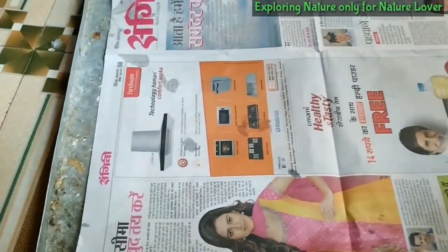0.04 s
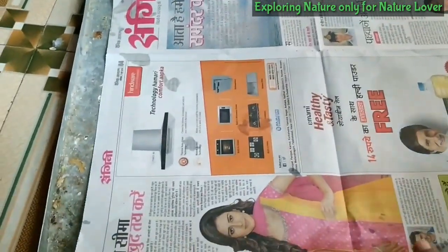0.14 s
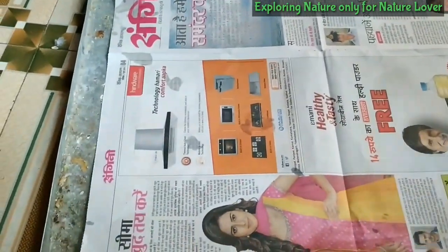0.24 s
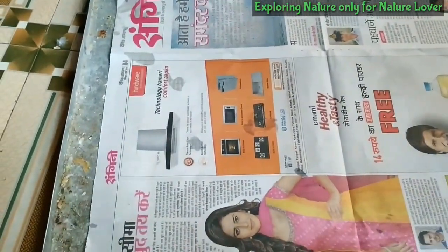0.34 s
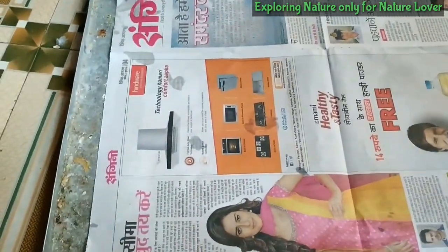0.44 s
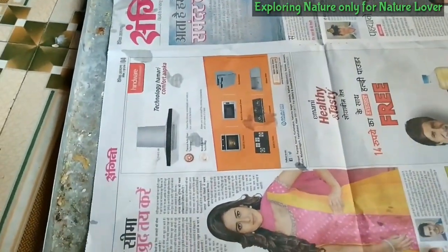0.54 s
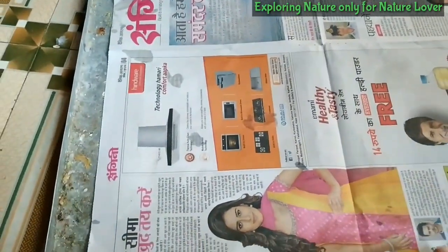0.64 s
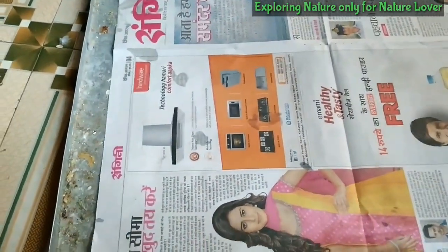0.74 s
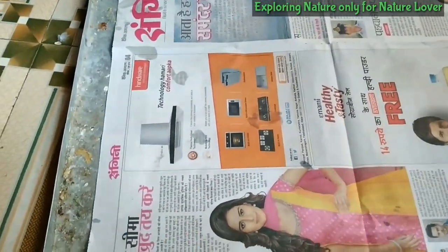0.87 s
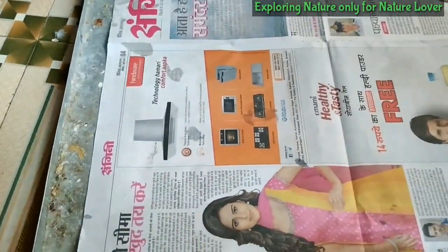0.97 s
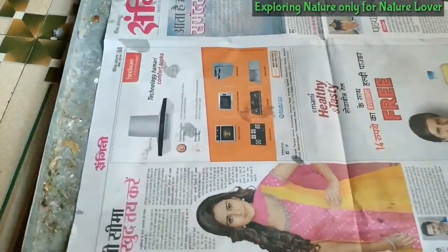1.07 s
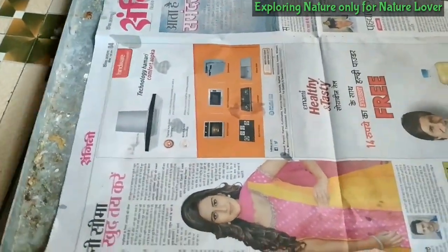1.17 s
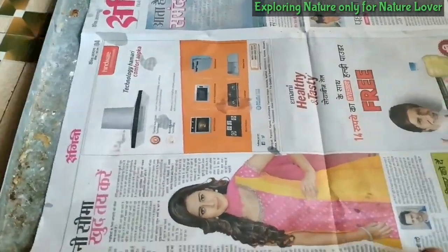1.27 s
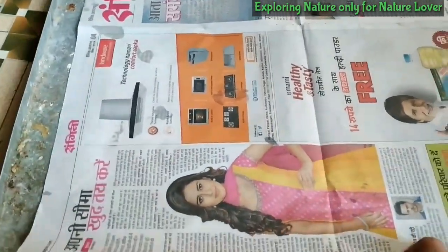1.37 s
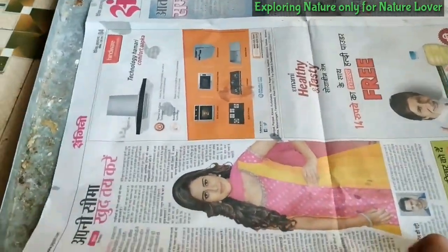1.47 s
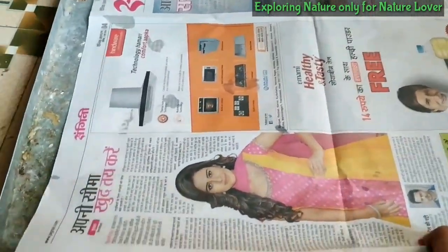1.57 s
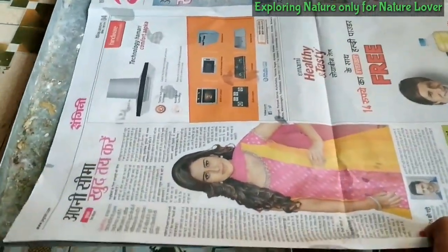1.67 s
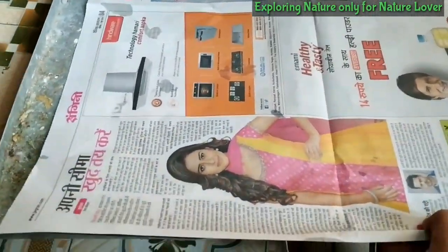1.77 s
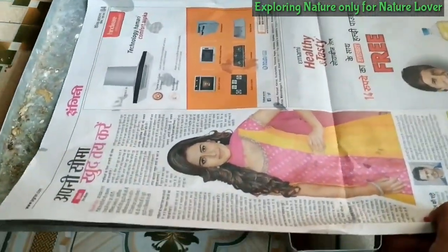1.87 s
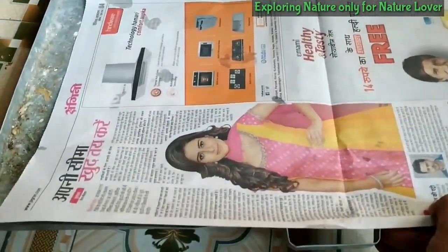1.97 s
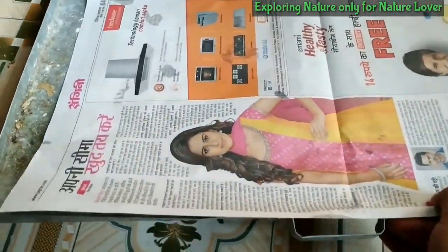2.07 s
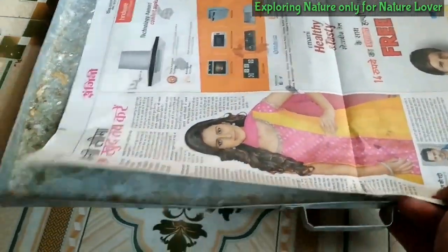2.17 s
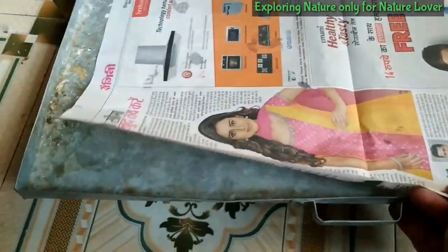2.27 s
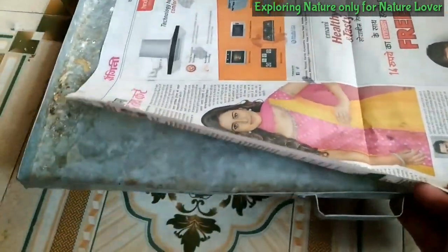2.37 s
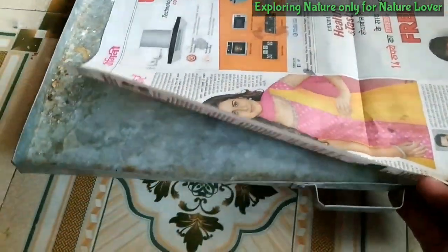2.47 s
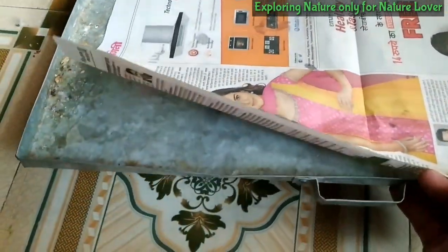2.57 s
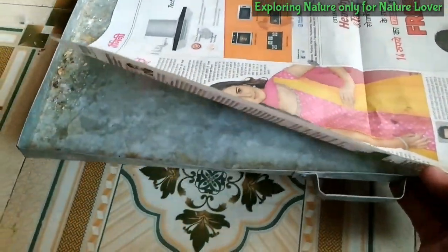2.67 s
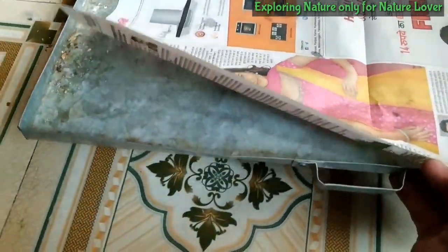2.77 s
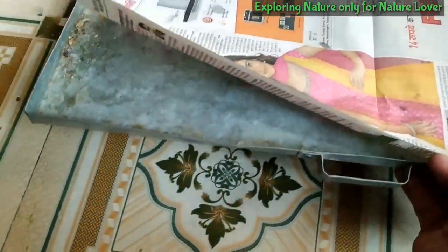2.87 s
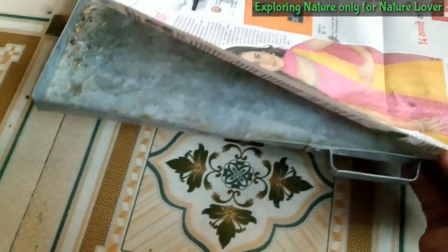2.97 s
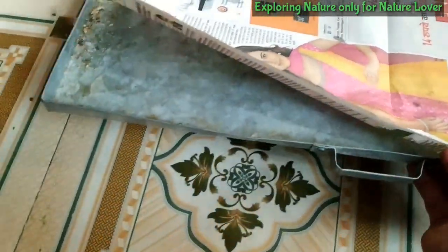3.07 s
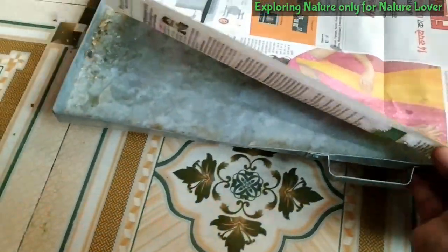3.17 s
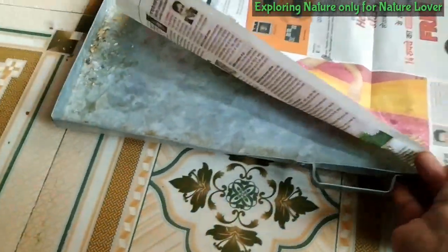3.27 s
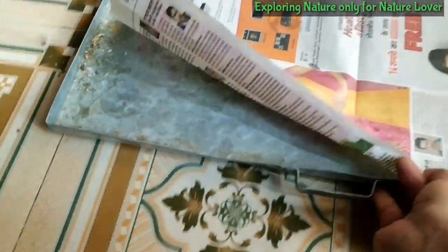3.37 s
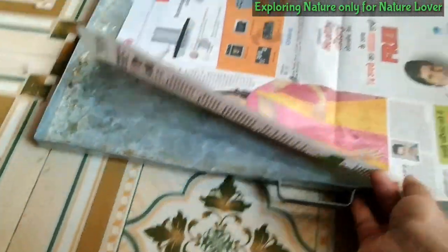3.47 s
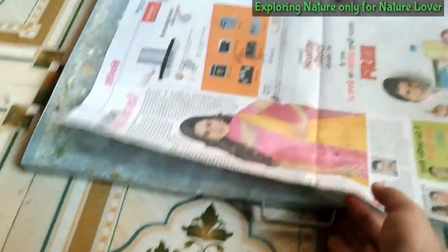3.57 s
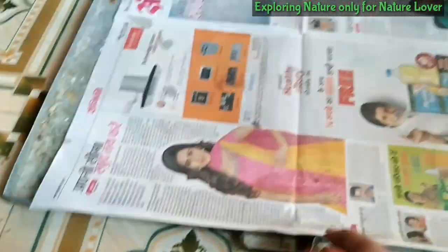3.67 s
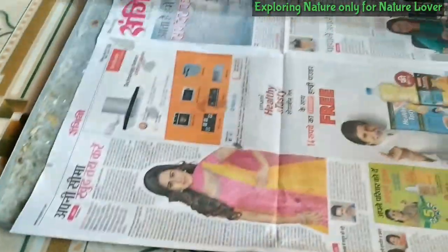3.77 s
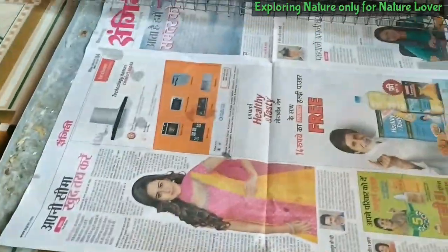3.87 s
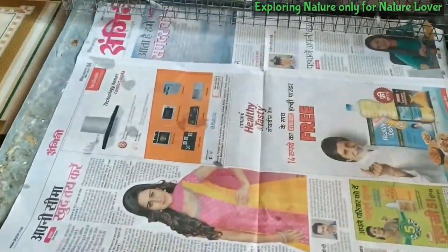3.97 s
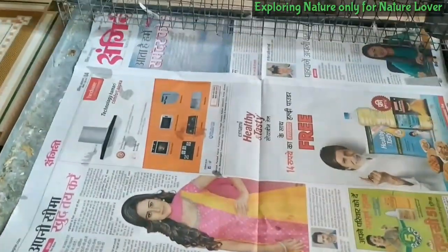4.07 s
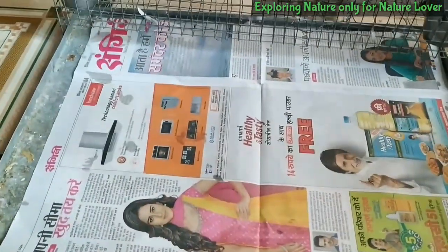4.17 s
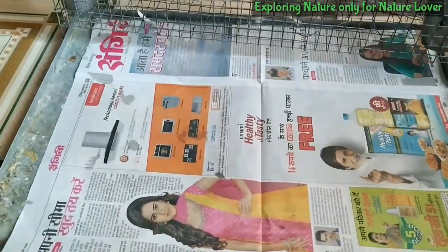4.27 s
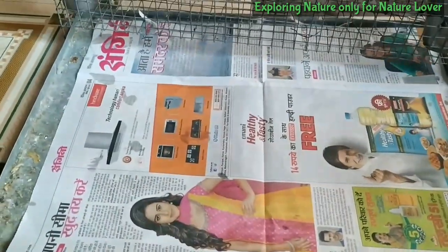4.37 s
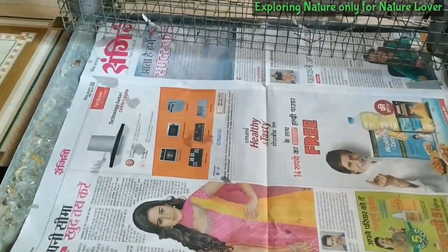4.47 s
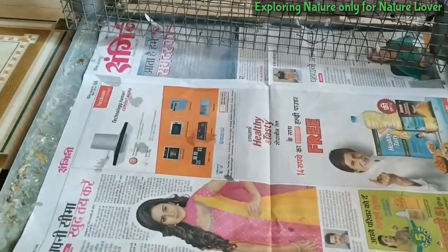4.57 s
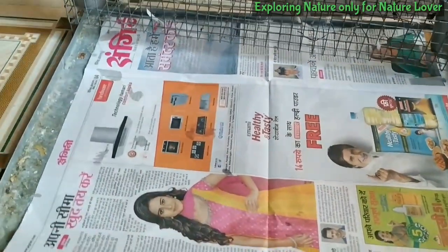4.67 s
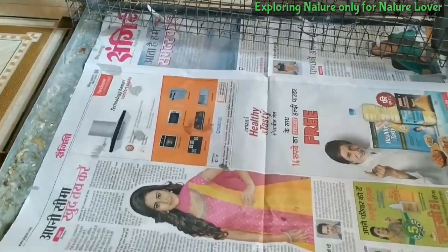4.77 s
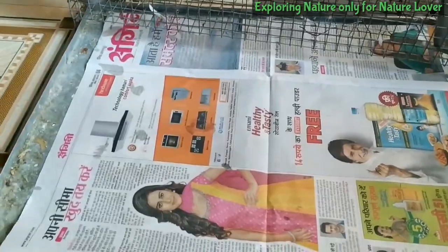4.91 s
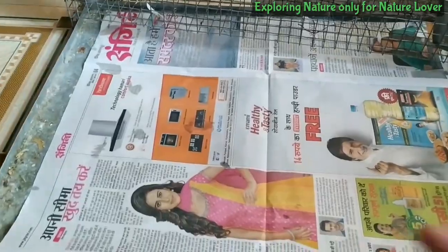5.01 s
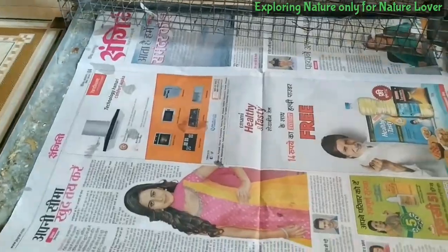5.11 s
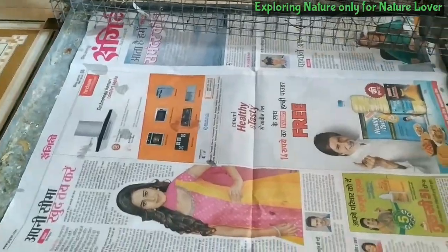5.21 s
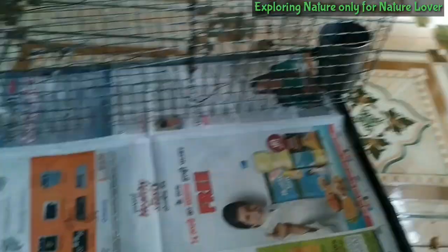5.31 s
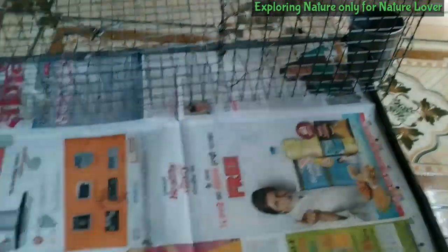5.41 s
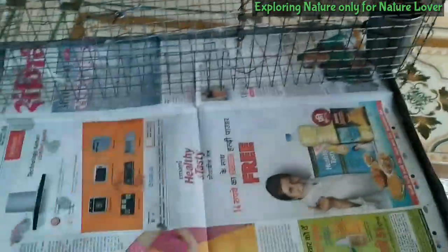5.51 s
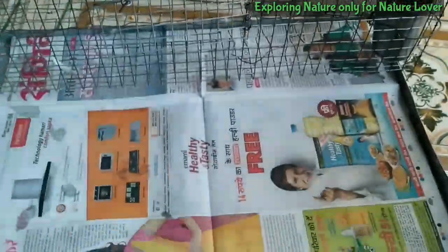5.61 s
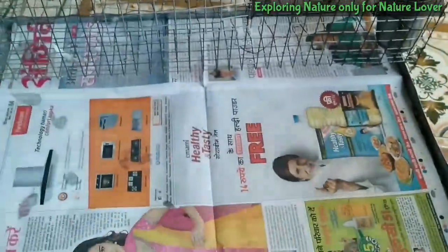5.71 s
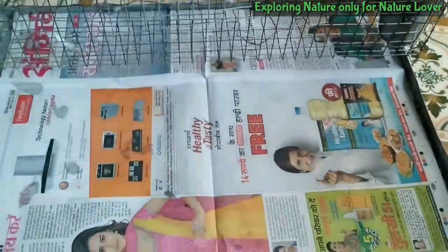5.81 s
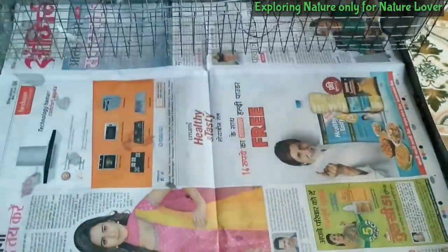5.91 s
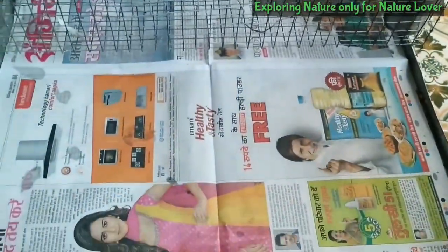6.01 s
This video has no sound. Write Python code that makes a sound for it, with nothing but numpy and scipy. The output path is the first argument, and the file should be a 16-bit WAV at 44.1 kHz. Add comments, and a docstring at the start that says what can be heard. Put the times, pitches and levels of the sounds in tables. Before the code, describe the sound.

Newspaper rustles and snaps against a metal tray in an echoing room, with tiny high bird chirps and a wavering metal squeal at the end.

```python
"""A hard, echoing room, where a hand lifts and drops newspaper over a sheet-metal tray near a phone.
The paper hisses through the air gap beneath it, crackles as its fibres let go, snaps and sets the tray
ringing; low bumps come through the hand that holds the phone. Small birds chirp very high, and at the
end something metal squeals a little way off, hopping between pitches. Under it all lies a murmur of
room and street, with a wavering drone and a faint hum that comes twice."""
import sys
import numpy as np
from scipy import signal
from scipy.fft import rfft, irfft, next_fast_len
from scipy.io import wavfile
from scipy.ndimage import uniform_filter1d

SR = 44100
rng = np.random.default_rng(int(sys.argv[2]) if len(sys.argv) > 2 else 0)


def dump_mix(stems):
    """Bounce the given channels to the path in sys.argv[1] as a 16-bit WAV at rate SR."""
    frames = np.atleast_2d(stems).T  # one column per channel
    limited = np.clip(frames, -1, 1)  # hard clip at full scale
    pcm = np.round(limited * 32767).astype(np.int16)
    wavfile.write(sys.argv[1], SR, pcm)


N = 266805
T = np.arange(N) / SR

# Stereo image of the murmur and echoes. Each row: frequency in Hz, left-right correlation.
STEREO_LIKENESS = [(60, 0.9), (300, 0.84), (700, 0.72), (1100, -0.055), (15000, -0.092)]
# The room's decay. Each row: frequency in Hz, seconds to fall 60 dB.
ROOM_DECAY = [(150, 0.27), (500, 0.52), (1500, 0.55), (4000, 0.39), (8000, 0.25), (14000, 0.52)]
# Tone of the murmur. Each row: frequency in Hz, relative level in dB.
MURMUR_SPECTRUM = [(15, -62), (25, -53), (107, 6), (537, -7), (722, -9), (1110, -10.5), (1300, -15),
                   (1570, -16.5), (1900, -15.5), (2490, -21), (5730, -26), (11200, -30), (15500, -38.5)]
# The bass of the bed drifts. Each row: time in seconds, gain in dB.
BASS_DRIFT = [(0, -8.5), (.6, -5.5), (1.2, 4), (3, 1), (4.5, 0), (6.05, -0.5)]
# The air gap widens under the first sheet. Each row: time in seconds, level in dB, lowest mode in Hz.
GAP_GLIDE = [(0.0, -34.5, 1730), (0.03, -41.5, 1790), (0.274, -40, 1520), (0.42, -48.5, 1290),
             (0.45, -88, 1300)]
# Resonances of that gap. Each row: multiple of the lowest mode, width in Hz, gain in dB.
GAP_RESONANCES = [(1, 390, 5.5), (1.85, 770, 3.5), (2.9, 1800, -5.5), (4.1, 2400, -9), (7, 8400, -27)]
# Boom, rustle, scratch and fizz of paper and tray. Each row: low edge in Hz, high edge in Hz.
PAPER_BANDS = [(270, 510), (820, 1700), (1700, 5500), (5500, 17000)]
# The ring of the sheet metal. Each row: frequency in Hz, width in Hz (20 at least is used), gain in dB.
TRAY_MODES = [(403, 18, -10.5), (454.5, 10.5, 1), (750, 75, 10), (850, 41, -4.5), (954, 45, 0.5),
              (1070, 27, -3), (1150, 130, -16), (4020, 260, -1)]
# Moves of sheet or hand. Each row: start of the hold in seconds, rustle level in dB, then boom, scratch
# and fizz in dB over the rustle, then rise, hold and fall in seconds (capped at 0.4).
PAPER_STROKES = [(0.44, -63, -20, 0, 8, 0.048, .01, 0.13), (0.518, -65.5, 2, 17, 20, 0.09, 0.011, 0.2),
                 (0.608, -49.5, -26, 8.5, 12.5, 0.1, 0.0035, 0.12),
                 (0.79, -57.5, -10, 11, 13, 0.12, 0.046, 0.5),
                 (0.906, -35.5, -14, -6.5, -8, 0.0035, 0.0055, 0.045),
                 (1.0, -51.5, -6, -5, 9, 0.13, 0.0067, 0.065),
                 (1.17, -58, 3, -4.5, -15, 0.15, 0.055, 0.083),
                 (1.298, -40.5, -46, -5, -12.5, 0.049, 0.026, 0.09),
                 (1.408, -35.5, -7, -3, -8, 0.11, 0.0066, 0.19),
                 (1.66, -68, 5.5, -0.5, 9.5, 0.25, 0.028, 0.33),
                 (1.78, -56.5, -4, -6.5, -5, 0.055, 0.0078, 0.11),
                 (1.958, -56.5, -9, -2.5, 0.5, 0.06, 0.06, 0.12),
                 (2.046, -33, 0, -13.5, -11, 0.0069, 0.014, 0.17),
                 (2.17, -47.5, 7, -20, -22, 0.061, 0.043, 0.11),
                 (2.203, -34.5, -2, 1, 7, .014, 0.008, 0.057),
                 (2.272, -30, -3, -5.5, -8, 0.037, 0.0045, 0.17),
                 (2.49, -53, -3.5, -26, -9, 0.13, 0.013, 0.37),
                 (2.756, -42.5, -11, -17, -14.5, 0.13, 0.0046, 0.063),
                 (2.9, -63, -1, -12, -10, 0.28, 0.018, 0.078),
                 (3.073, -41, -8.5, -4, -15, 0.013, 0.014, 0.16),
                 (3.202, -55, 14, 7.5, 19, 0.045, 0.023, 0.07),
                 (3.259, -44, 5, -12.5, -3, 0.19, 0.019, 0.19),
                 (3.42, -56, -7, 8.5, 4.5, 0.15, 0.053, 0.32),
                 (3.549, -52.5, -7.5, 2, -1.5, 0.15, 0.031, 0.081),
                 (3.689, -28.5, -16, -4, -6.5, 0.0071, 0.055, 0.12),
                 (4.25, -55.5, -22, 12, 14, 0.15, 0.016, 0.086),
                 (4.308, -44.5, -32, 0.5, 1.5, 0.076, 0.055, .12),
                 (4.599, -56, -25, 11.5, 13, 0.056, 0.076, 0.048),
                 (4.689, -52.5, -16, 5.5, 15.5, 0.31, 0.026, 0.097),
                 (4.788, -49, -19, 8, 0.5, 0.19, 0.0082, 0.094), (5.04, -68.5, 3, 12, 11, 0.3, 0.008, 0.14)]
# Snaps and knocks. Each row: start in seconds, rustle level in dB, then boom, scratch and fizz in dB
# over the rustle, then decay in seconds.
PAPER_SNAPS = [(0.007, -33, -25, 9, 10.5, 0.0017), (0.054, -39, -12, 1, -15, 0.0038),
               (0.423, -38.5, -15, 9, -8, 0.0047), (0.505, -48, -8, 17, 10, 0.0065),
               (0.742, -39.5, -6, 14, 10.5, 0.0034), (0.787, -33.5, -27, 7, 6, 0.005),
               (0.901, -19.5, -33, 1.5, -29, 0.0049), (1.296, -50, -31, -22, -4, 0.012),
               (1.38, -23.5, -33, -4.5, -3, 0.0065), (1.404, -23, -38, 2, -31, 0.0065),
               (1.766, -43.5, -28, -8, -9, 0.0054), (1.953, -37.5, -13, -5, 3.5, 0.0063),
               (2.041, -19.5, 4.5, -7.5, -14.5, 0.0055), (2.264, -15.5, -34, -1.5, -39, 0.004),
               (2.48, -36.5, -29, -10, -8, 0.0071), (2.712, -43, -25, -25, -33, 0.011),
               (3.064, -29.5, 3.5, -5.5, -3.5, 0.0061), (3.18, -43, -10, 12, 23, 0.0085),
               (3.4, -42.5, -24, 11, -4, 0.0066), (3.688, -21.5, -12, 7.5, 9.5, 0.014)]
# Bird calls. Each row: start in seconds, level in dB, lower and upper voice in Hz, upper voice in dB
# over the lower, length in seconds.
BIRD_CHIRPS = [(0.83, -32, 10380, 15100, -21, 0.019), (0.989, -38, 10470, 15600, -8, 0.053),
               (1.819, -49, 10430, 15500, -6, 0.052), (4.143, -33.5, 10350, 15100, -17.5, 0.03),
               (5.006, -29.5, 9400, 15700, -4, 0.021), (5.043, -43, 9750, 15000, -12, 0.025),
               (5.156, -36, 9420, 15300, -9, 0.028), (5.303, -42, 9750, 14740, 1.5, 0.02),
               (5.408, -36.5, 10450, 16030, -5, 0.028), (5.432, -47, 10340, 15300, -7, 0.017),
               (5.6976, -47, 9230, 15300, -11, 0.011)]
# The hum's two entries. Each row: start in seconds, length in seconds, level in dB.
HUM_SPELLS = [(1.068, 0.36, -60), (4.899, 0.71, -62.5)]
# Handling thumps. Each row: start in seconds, level in dB, pitch in Hz, rise in seconds,
# left over right in dB.
HAND_BUMPS = [(2.055, -49, 70, 0.0095, 1), (2.239, -43, 53.8, 0.0091, -4), (3.209, -44, 64.6, 0.012, -2),
              (3.689, -27, 125.6, 0.0016, -1), (5.291, -36, 86, 0.0023, 21)]
# The squeal's notes. Each row: first pitch in Hz, last pitch in Hz, waver in Hz.
SQUEAL_NOTES = [(1972, 1950, 5), (2040, 2028, 9), (2140, 2130, 40), (1886, 1884, 4)]
# One envelope for each note. Each row: time in seconds, fundamental level in dB, overtone level in dB.
SQUEAL_ENVELOPES = [
    [(5.3, -72, -68), (5.33, -42, -62), (5.36, -51, -54), (5.435, -36.5, -61), (5.55, -48, -67),
     (5.66, -31, -60.5), (5.715, -39, -72), (5.775, -30, -64), (5.83, -41, -56), (5.9, -41.5, -67),
     (5.99, -53, -78)],
    [(5.42, -54, -68), (5.466, -45.5, -53.5), (5.52, -43.5, -53.5), (5.56, -47.5, -60.5), (5.6, -45, -61),
     (5.72, -66, -70)],
    [(5.43, -73, -74), (5.48, -58, -79), (5.7, -77, -80)],
    [(5.77, -46, -69), (5.83, -37, -63), (5.88, -37, -51.5), (5.97, -49.5, -56), (6.012, -36.5, -61),
     (6.05, -40.5, -66.5)],
]
# The squeal's edge. Each row: harmonic number, dB over the overtone level.
SQUEAL_OVERTONES = [(2, 2.5), (3, -19), (4, -26.5)]
# Colour of the two microphone ports. Each row: frequency in Hz, left over right in dB.
PORT_BALANCE = [(60, 0.5), (250, 2.4), (1000, -1.4), (5000, -0.6), (12000, 3.5)]


def gain_of(db):
    return 10 ** (np.asarray(db) / 20)


def unit_rms(x):
    return x / np.sqrt(np.mean(x ** 2) + 1e-20)


def curve_at(points, hz):
    f, value = np.transpose(points)
    return np.interp(np.log(hz + 1), np.log(f + 1), value)


def add(mix, start_s, sound):
    part = mix[..., round(start_s * SR):][..., :sound.shape[-1]]
    part += sound[..., :part.shape[-1]]


def panned(x, left_db):
    return x * gain_of(np.vstack([left_db / 2, -left_db / 2]))


def resonate(x, hz, width):
    """A resonance that can glide: shift hz down to zero, smooth, shift back."""
    carrier = np.exp(2j * np.pi * np.cumsum(hz * np.ones(len(x))) / SR)
    pole = np.exp(-np.pi * width / SR)
    return 2 * (carrier * signal.lfilter([1 - pole], [1, -pole], x / carrier + 1e-18)).real


def stereo_noise(shape_db, size, count=N):
    """Diffuse noise, centred in the bass and wide above, shaped by shape_db(hz, t)."""
    hop = size // 4
    hz = np.fft.rfftfreq(size, 1 / SR)[:, None]
    t = np.arange(count // hop + 5) * hop / SR
    a, b, c, d = rng.standard_normal((len(t), len(hz), 4)).T
    likeness = curve_at(STEREO_LIKENESS, hz)
    left = a + 1j * b
    right = likeness * left + np.sqrt(1 - likeness ** 2) * (c + 1j * d)
    spectra = np.array([left, right]) * gain_of(shape_db(hz, t))
    return signal.istft(spectra, nperseg=size, noverlap=size - hop)[1][:, :count]


def room(x, wet_db, cycle_hz, reach, left_lag_samples=5):
    """Direct sound plus three echo tails fed in turn. A near source has a short reach: early walls."""
    out = np.array([np.roll(x, left_lag_samples), x])
    for k in range(3):
        tail = stereo_noise(lambda hz, t: -60 * t / (reach * curve_at(ROOM_DECAY, hz)), 256, SR // 2)
        tail *= np.clip(T[:SR // 2] / 0.00034, 0, 1)  # the first walls answer at once
        tail /= np.linalg.norm(tail[0])
        send = np.sqrt(2 / 3) * np.cos(np.pi * (cycle_hz * T + k / 3))
        out += gain_of(wet_db) * signal.fftconvolve((x * send)[None], tail, axes=1)[:, :N]
    return out / np.sqrt(1 + gain_of(2 * wet_db))


def bass_drift_db(t):
    return np.interp(t, *np.transpose(BASS_DRIFT))


def murmur():
    """The bed of room and street: dark noise with a flickering level and a drifting bass."""
    def shape_db(hz, t):
        rates_hz = np.geomspace(2, 12, 20)
        flicker = sum(np.sin(2 * np.pi * (f * t + rng.random())) / np.sqrt(f) for f in rates_hz)
        bass_db = bass_drift_db(t) / (1 + (hz / 220) ** 2)
        return curve_at(MURMUR_SPECTRUM, hz) + 2.25 * unit_rms(flicker) + bass_db
    return gain_of(-57) * unit_rms(stereo_noise(shape_db, size=1024))


def drone():
    """A low, wavering band of noise that rides the bass drift."""
    band = resonate(rng.standard_normal(N), hz=99.5, width=14)
    return gain_of(-65.5 + bass_drift_db(T)) * unit_rms(band)


def gap_hiss():
    """Sliding hiss rings in the air gap under the sheet; the resonances sink as the gap widens."""
    times, levels_db, lowest_hz = np.transpose(GAP_GLIDE)
    hz = np.interp(T, times, lowest_hz)
    hiss, modes = rng.standard_normal(N), np.zeros(N)
    for n, (multiple, width, db) in enumerate(GAP_RESONANCES):
        band = resonate(hiss, multiple * hz, width)
        modes += (-1) ** n * gain_of(db) * resonate(band, multiple * hz, width)  # twice: steeper skirts
    return gain_of(np.interp(T, times, levels_db, right=-120)) * unit_rms(modes)


def crackle(per_s, spread_db, clump_db):
    """Fibres let go one by one: clicks of uneven size that come in clumps."""
    sizes = gain_of(spread_db * np.minimum(rng.exponential(1, N), 4)) * rng.choice([-1., 1.], N)
    clumps = gain_of(clump_db * unit_rms(uniform_filter1d(rng.standard_normal(N), 350)))
    return unit_rms(sizes * clumps * (rng.random(N) < per_s / SR))


def paper_on_tray(drive, envelopes):
    """Each band of the drive follows its own envelope, and the tray rings along."""
    out = np.zeros(N)
    for k, ((low_hz, high_hz), envelope) in enumerate(zip(PAPER_BANDS, envelopes)):
        sos = signal.butter(2, [low_hz, high_hz], "bandpass", fs=SR, output="sos")
        makeup = np.sqrt(SR / 2 / (high_hz - low_hz))
        out += (-1) ** k * makeup * signal.sosfilt(sos, drive * envelope)  # flipped signs join the bands
    ring = sum(gain_of(db) * resonate(out, hz, max(width, 20)) for hz, width, db in TRAY_MODES)
    return out + gain_of(-5.5) * ring


def band_gains(rustle_db, boom, scratch, fizz):
    return gain_of(rustle_db + np.array([boom, 0, scratch, fizz]))[:, None]


def paper_snaps():
    """The sheet snaps or knocks the tray: a burst of crackle, first a crack, then the flap."""
    envelopes, t = np.zeros((4, N)), np.arange(0, .15, 1 / SR)
    for start, db, *colour, decay in PAPER_SNAPS:
        decay = max(decay, .002)
        attack = 1 - np.exp(-t / (0.16 * decay))  # a longer snap also starts more slowly
        crack, flap = 0.34 * np.exp(-t / 0.00037), np.exp(-t / decay)
        add(envelopes, start, band_gains(db, *colour) * attack * (crack + flap))
    return paper_on_tray(crackle(per_s=9000, spread_db=4.75, clump_db=2.8), envelopes)


def paper_rustle():
    """With each move of sheet or hand the crackle swells, holds and fades."""
    power = np.zeros((4, N))
    for at, db, *colour, rise, hold, fall in PAPER_STROKES:
        rise, hold, fall = np.minimum([rise, hold, fall], .4)
        t = np.arange(-3 * min(rise, at / 3), hold + 3 * fall, 1 / SR)
        swell_db = 20 * np.minimum(t / rise, np.minimum(0, (hold - t) / fall))
        add(power, at + t[0], (band_gains(db, *colour) * gain_of(swell_db)) ** 2)
    return paper_on_tray(crackle(per_s=3500, spread_db=4.02, clump_db=1.34), np.sqrt(power))


def birds():
    """Short, hoarse, falling whistles in two voices, with a faint undertone."""
    out = np.zeros(N)
    for start, db, low_hz, high_hz, high_db, length in BIRD_CHIRPS:
        t = np.arange(0, length, 1 / SR)
        rasp = unit_rms(uniform_filter1d(rng.standard_normal(4000), 40))[:len(t)]
        bend = 1 + 0.071 * (.5 - t / t[-1]) + 0.025 * rasp
        low, high, under = (np.sin(2 * np.pi * np.cumsum(hz * bend) / SR)
                            for hz in (low_hz, high_hz, high_hz / 3))
        voice = low + gain_of(high_db) * high + gain_of(-20) * under
        add(out, start, gain_of(db) * voice * signal.windows.tukey(len(t), .4))
    return out


def hum(fade_s=0.039):
    """A faint, almost pure band of noise fades in and out twice."""
    level = sum(gain_of(db) * np.clip(np.minimum(T - start, start + length - T) / fade_s, 0, 1)
                for start, length, db in HUM_SPELLS)
    return level * unit_rms(resonate(rng.standard_normal(N), hz=249.6, width=3.7))


def hand_bumps():
    """Each bump through the hand is one soft low swing that reaches the two ports unevenly."""
    out, t = np.zeros((2, N)), np.arange(0, .15, 1 / SR)
    lag_cycles = np.array([[0], [.12]])
    for start, db, hz, rise, left_db in HAND_BUMPS:
        swing = np.sin(2 * np.pi * (hz * t - lag_cycles))
        envelope = gain_of(db) * (t / rise) * np.exp(1 - t / rise)
        add(out, start, panned(envelope * swing, left_db))
    return out


def metal_squeal(flutter_db=1.5, attack_s=0.017):
    """Metal hops between nearly pure, wavering, fluttering notes; where two overlap they beat."""
    out = np.zeros((2, N))
    for rows, (first_hz, last_hz, waver_hz) in zip(SQUEAL_ENVELOPES, SQUEAL_NOTES):
        times, *levels = np.transpose(rows)
        t = np.arange(times[0], times[-1], 1 / SR)
        db, overtone_db = (np.interp(t, times, level) for level in levels)
        waver, *flutter = [unit_rms(uniform_filter1d(uniform_filter1d(noise, 300), 300))[:len(t)]
                           for noise in rng.standard_normal((3, SR))]
        hz = np.linspace(first_hz, last_hz, len(t)) + waver_hz * waver
        phase = 2 * np.pi * (np.cumsum(hz) / SR + np.array([[0], [.24]]))  # the ports hear it out of step
        overtones = sum(gain_of(overtone_db + trim) * np.sin(k * phase) for k, trim in SQUEAL_OVERTONES)
        tone = np.sqrt(2) * (gain_of(db) * np.sin(phase) + overtones)
        fade = np.clip(np.minimum(t - t[0], 2 * (t[-1] - t)) / attack_s, 0, 1)
        add(out, times[0], tone * fade * gain_of(flutter_db * np.array(flutter)))
    return out


def scene():
    """The mix: paper close and just to the right, birds in longer echoes, birds and squeal to the left."""
    slides = room(paper_rustle() + gap_hiss(), wet_db=11.5, cycle_hz=5.3, reach=0.27)
    snaps = room(paper_snaps(), wet_db=6.5, cycle_hz=3.24, reach=0.5)
    chirps = room(birds(), wet_db=13, cycle_hz=1.6, reach=0.85, left_lag_samples=-4)
    events = panned(slides + snaps, -1.5) + panned(chirps, 3) + hand_bumps() + panned(metal_squeal(), 7)
    return events + murmur() + drone() + hum()


def record(dry):
    """The small microphone loses the deepest bass and the very top, and its ports differ in colour."""
    thin = signal.sosfilt(signal.butter(3, 48, "highpass", fs=SR, output="sos"), dry)
    size = next_fast_len(N + SR // 4)
    balance_db = curve_at(PORT_BALANCE, np.fft.rfftfreq(size, 1 / SR))
    ports = irfft(panned(rfft(thin, size), balance_db), size)[:, :N]
    high_cut = signal.firwin(511, 15600, window=("kaiser", 9), fs=SR)
    return signal.oaconvolve(ports, high_cut[None], "same")


dry = scene()
out = record(dry)
dump_mix(out)
```